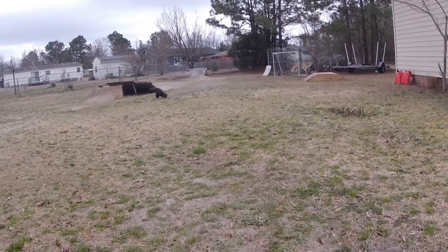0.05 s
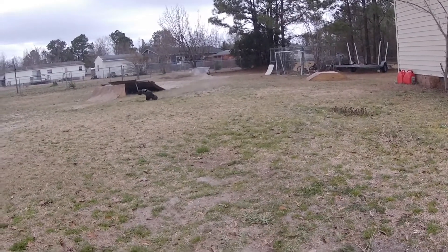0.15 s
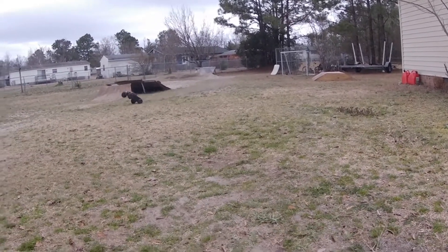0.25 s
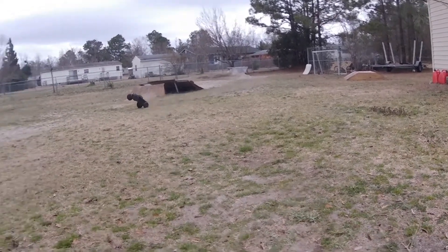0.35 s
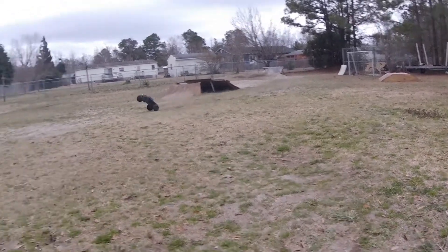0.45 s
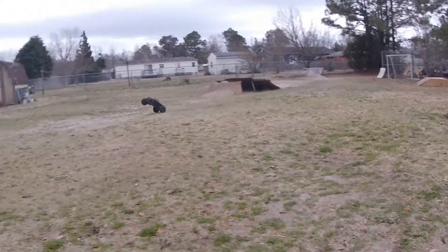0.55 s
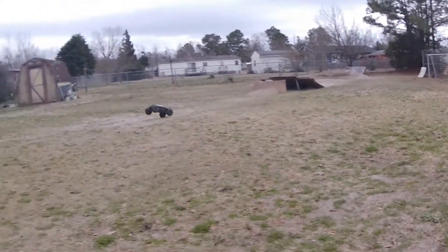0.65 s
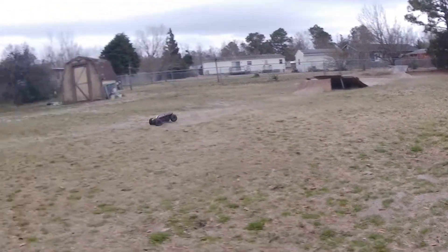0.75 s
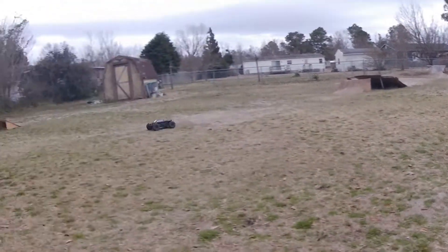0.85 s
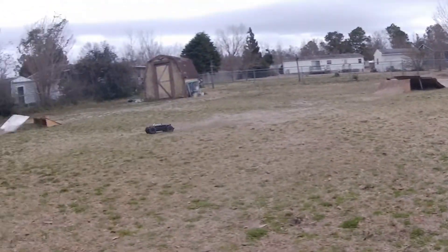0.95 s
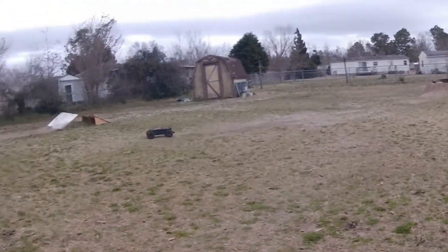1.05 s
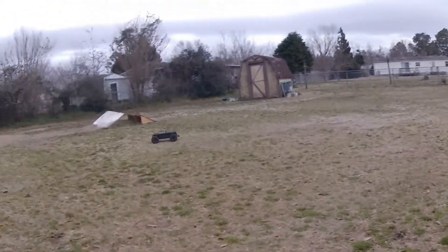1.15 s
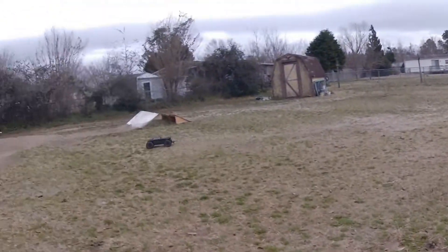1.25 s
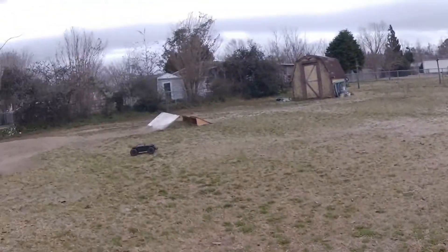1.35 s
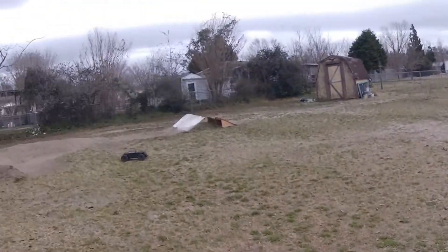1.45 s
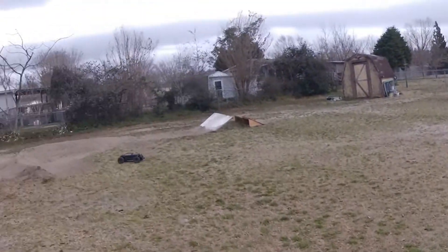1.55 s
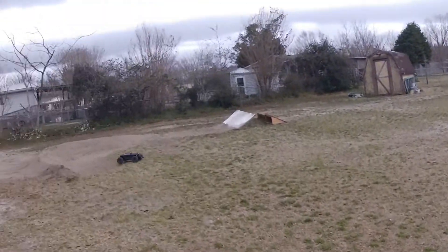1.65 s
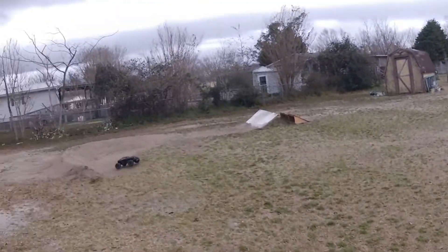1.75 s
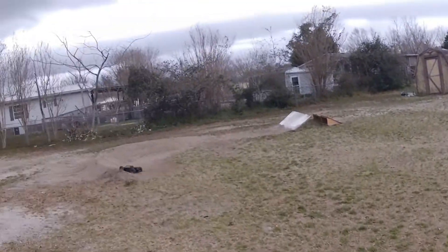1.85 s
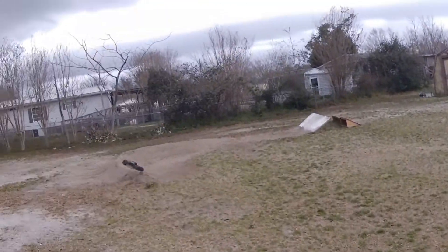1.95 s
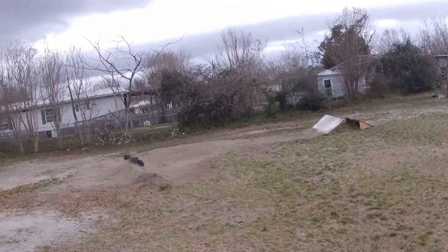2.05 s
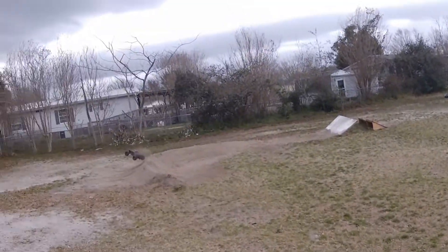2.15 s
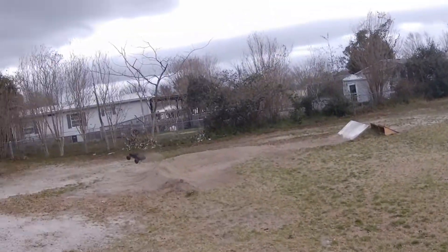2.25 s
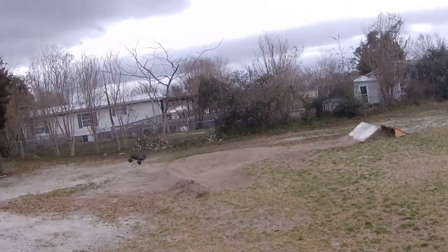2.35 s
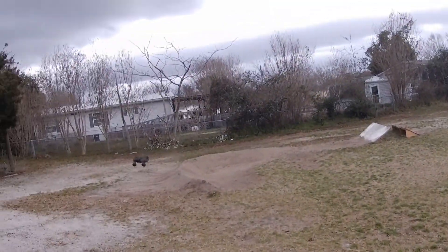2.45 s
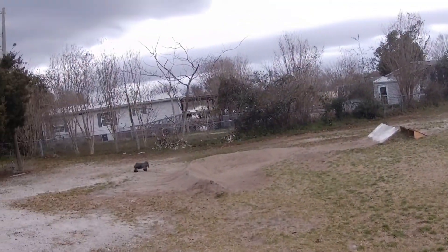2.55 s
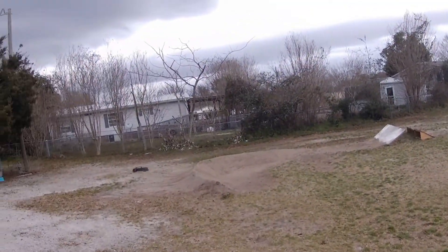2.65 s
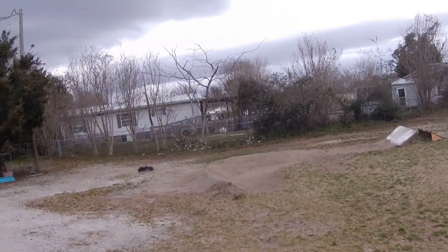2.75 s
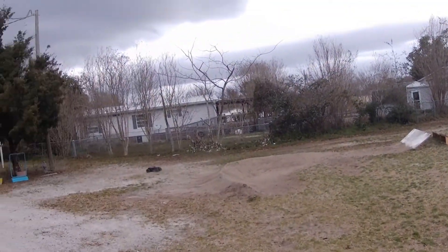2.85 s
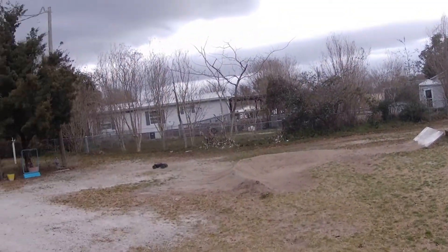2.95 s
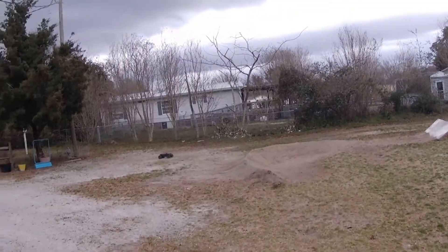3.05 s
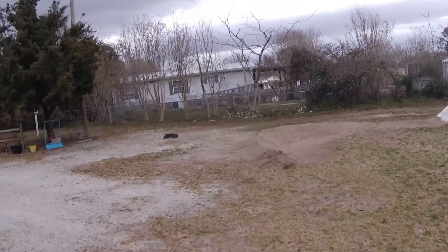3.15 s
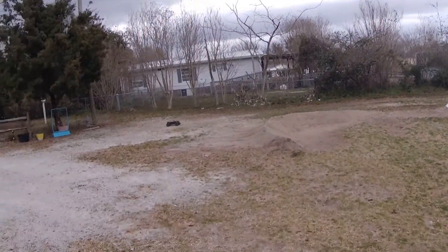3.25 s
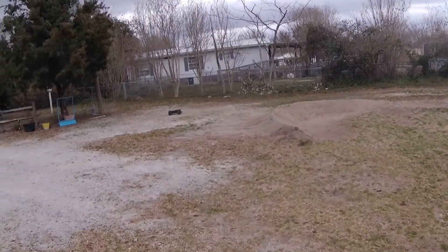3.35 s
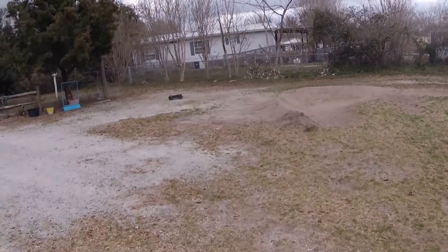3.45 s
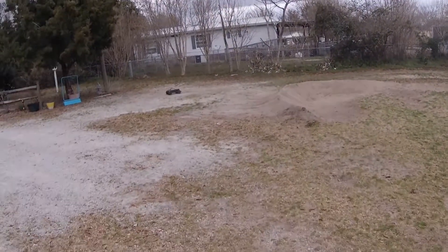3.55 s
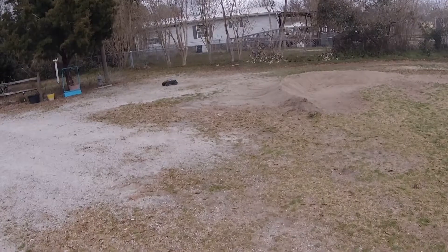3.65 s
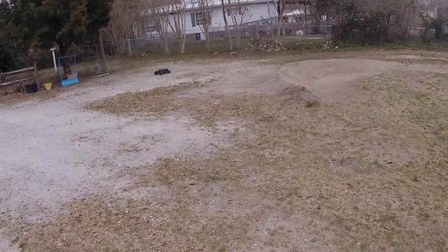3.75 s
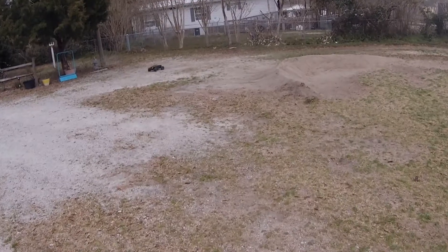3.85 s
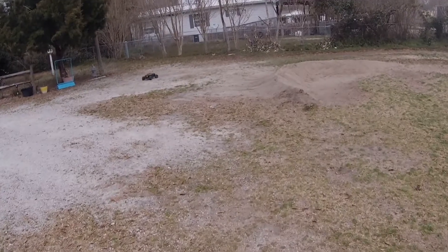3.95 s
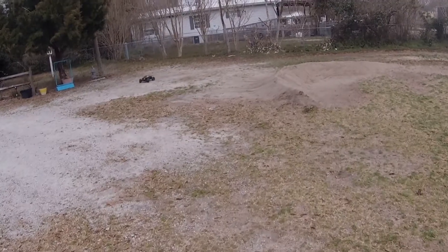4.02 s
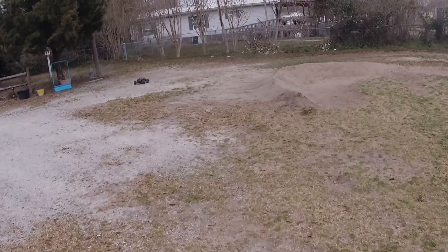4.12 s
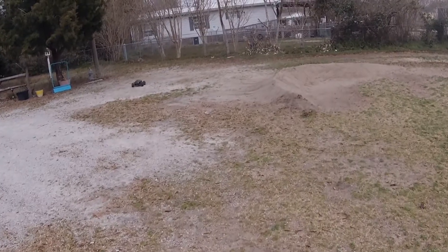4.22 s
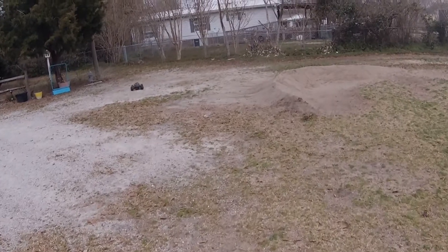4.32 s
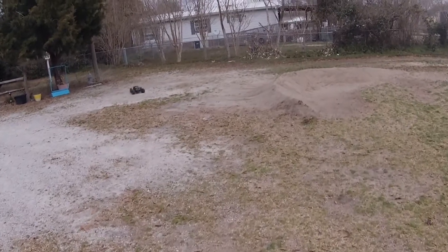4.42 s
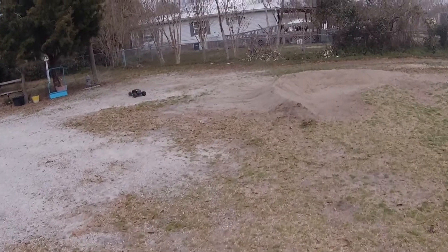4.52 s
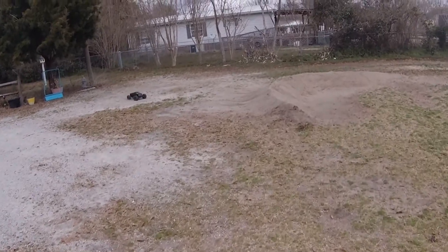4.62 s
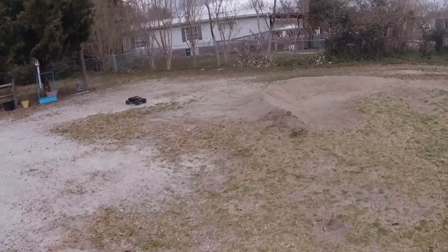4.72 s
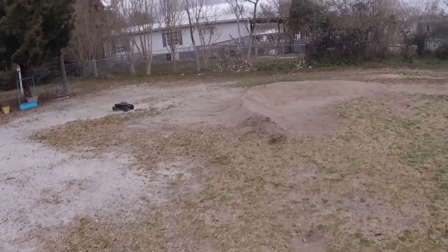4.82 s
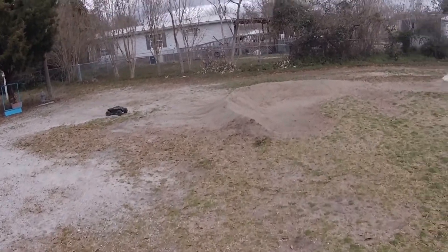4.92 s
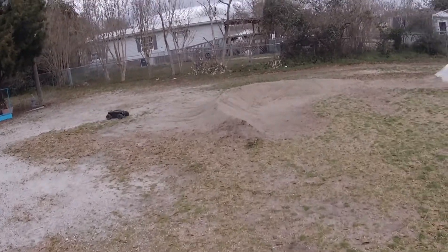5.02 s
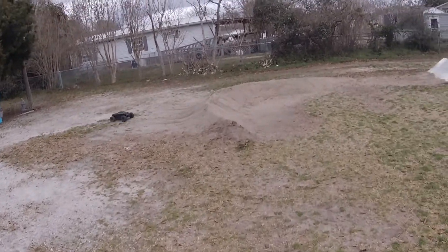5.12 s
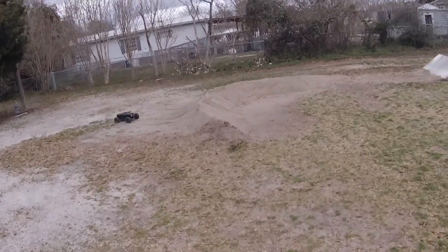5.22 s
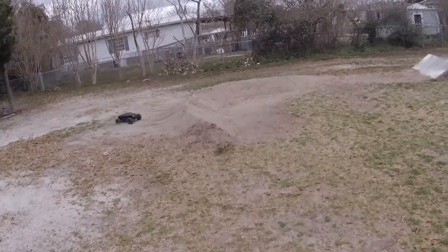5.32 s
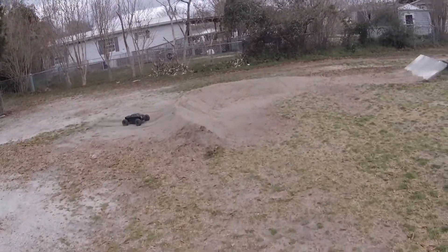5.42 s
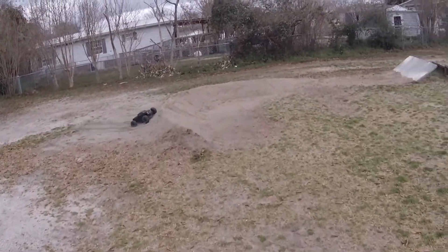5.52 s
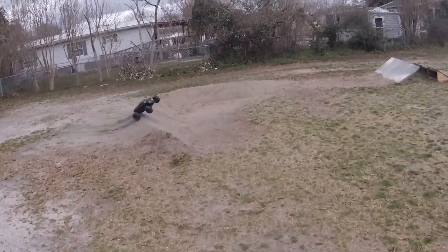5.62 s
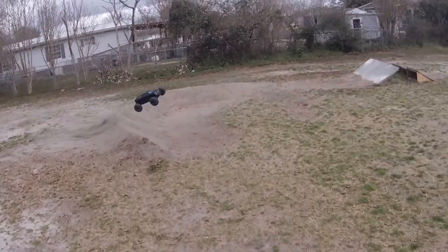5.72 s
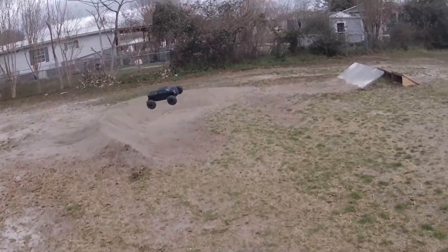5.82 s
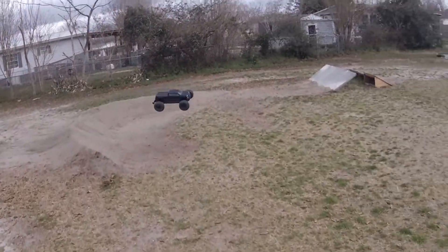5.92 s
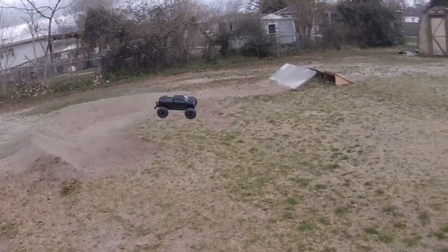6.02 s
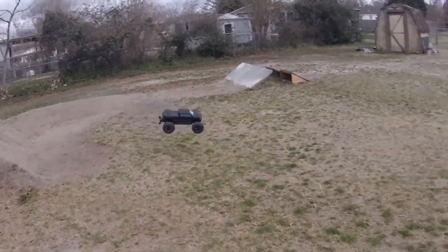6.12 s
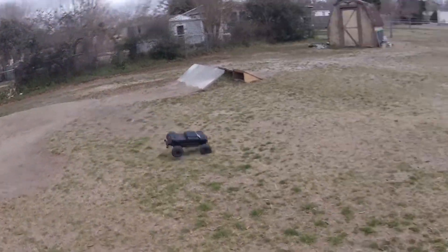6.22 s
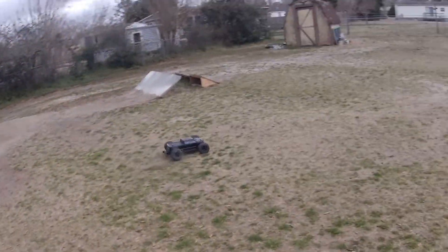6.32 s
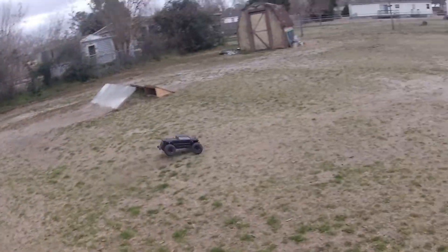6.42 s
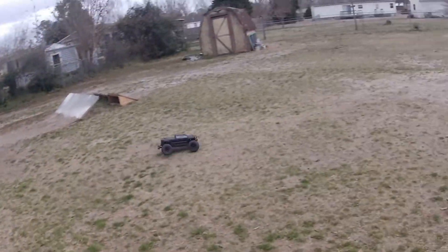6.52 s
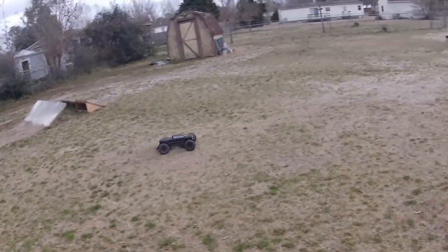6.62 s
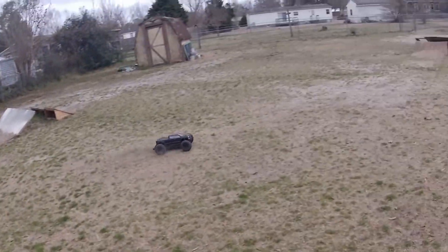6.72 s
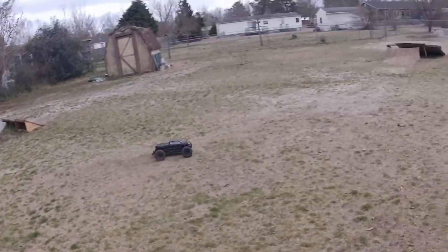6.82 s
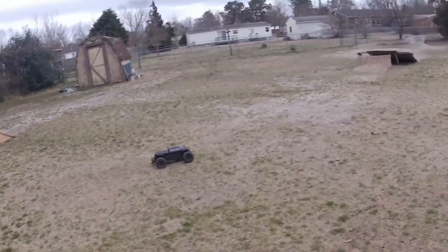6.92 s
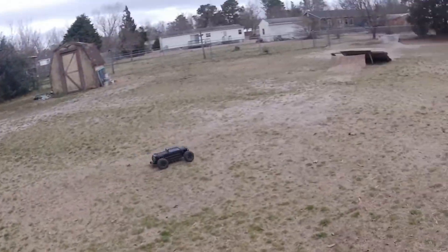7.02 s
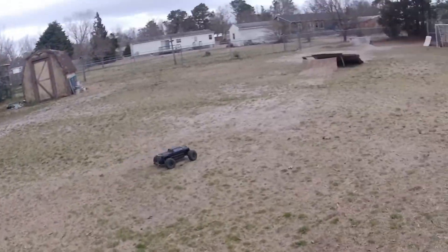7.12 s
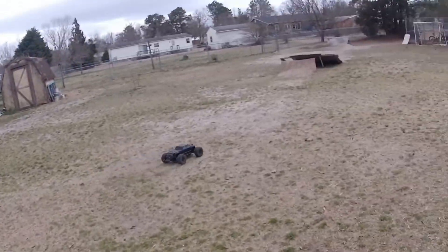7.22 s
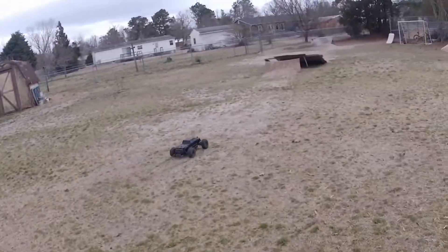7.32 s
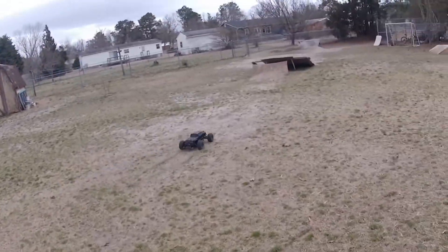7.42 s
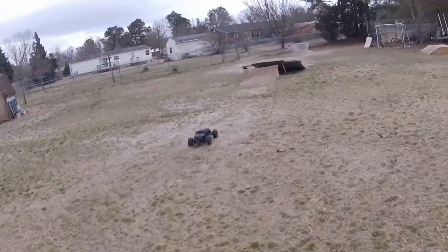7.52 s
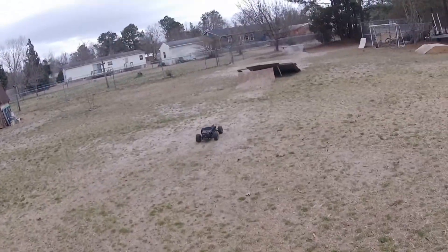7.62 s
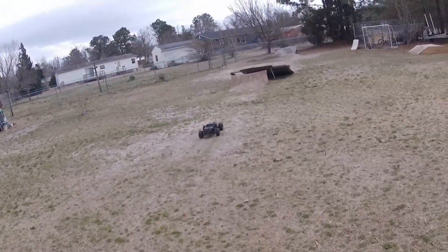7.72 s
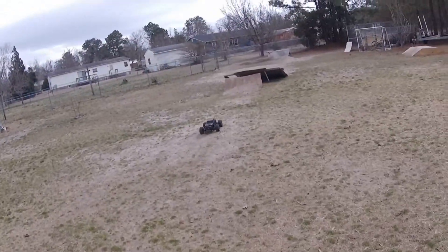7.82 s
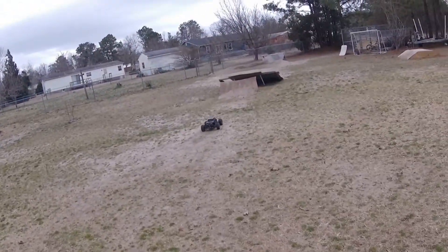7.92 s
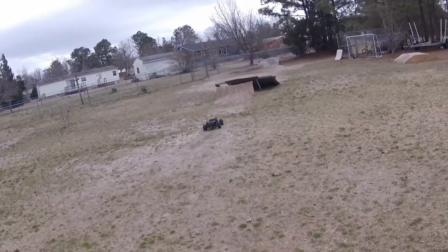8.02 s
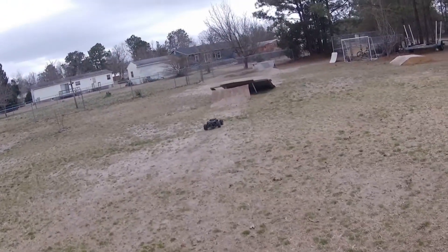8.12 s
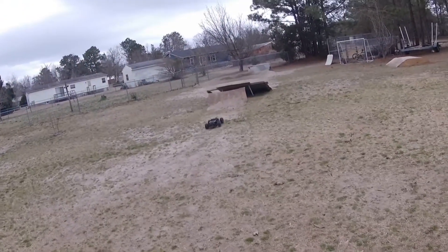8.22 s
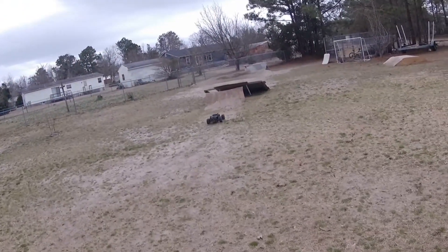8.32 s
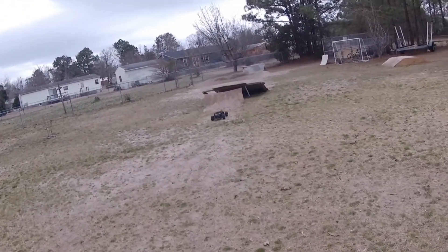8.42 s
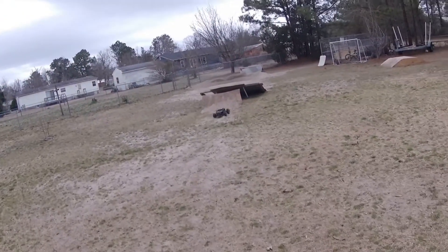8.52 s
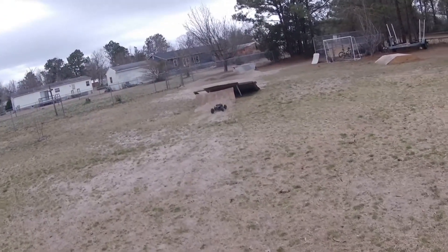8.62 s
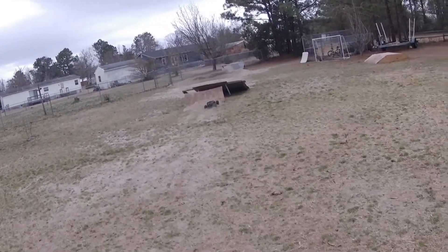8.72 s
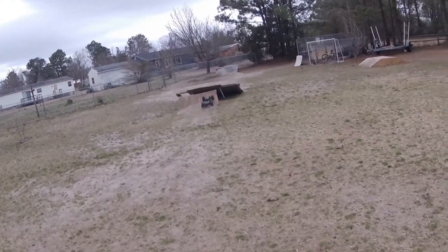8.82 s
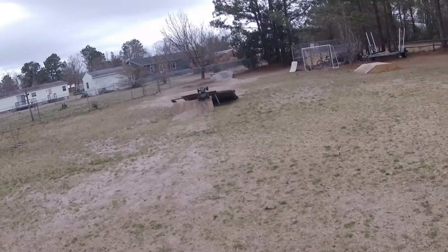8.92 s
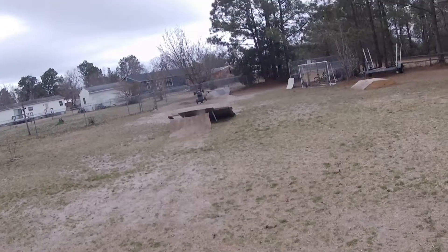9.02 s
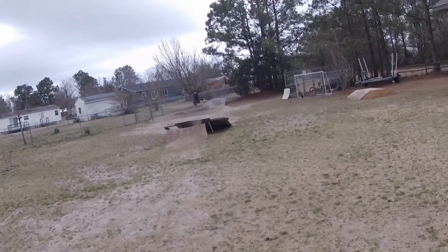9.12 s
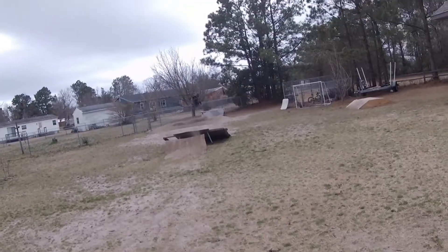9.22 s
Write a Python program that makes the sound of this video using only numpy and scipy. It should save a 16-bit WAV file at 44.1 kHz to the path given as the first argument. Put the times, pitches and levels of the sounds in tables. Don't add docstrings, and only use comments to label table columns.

```python
import sys
import numpy as np
from scipy import signal
from scipy.fft import rfft, irfft, next_fast_len
from scipy.io import wavfile
from scipy.ndimage import uniform_filter1d

SR = 44100
rng = np.random.default_rng(int(sys.argv[2]) if len(sys.argv) > 2 else 0)


def transcribe(signal):
    frames = np.atleast_2d(signal).T
    limited = np.clip(frames, -1, 1)
    pcm = np.round(limited * 32767).astype(np.int16)
    wavfile.write(sys.argv[1], SR, pcm)


def attenuation_scalar(level_db):
    decades = np.asarray(level_db, float) / 20
    return 10 ** decades


N = 408366


def shape(table, hz):
    f, db = np.transpose(table)
    return np.interp(np.log(np.maximum(hz, 1)), np.log(f), db, left=-80, right=-60)


def colour(x, table, lo, hi):
    n = next_fast_len(N)
    hz = np.arange(n // 2 + 1) * SR / n
    s = rfft(x, n) * attenuation_scalar(shape(table, hz))
    band = s[(hz > lo) & (hz < hi)]
    return irfft(s, n)[:N] * np.sqrt(n * N) / np.sqrt(2 * np.sum(np.abs(band) ** 2))


def walk(rate):
    k = int(SR / rate)
    held = np.repeat(rng.standard_normal(N // k + 1), k)
    return 1.3 * uniform_filter1d(uniform_filter1d(held, k), k)[:N]


def flutter(lo, hi):
    band = signal.butter(1, [lo, hi], "band", fs=SR, output="sos")
    x = signal.sosfilt(band, rng.standard_normal(N))
    return x / np.std(x)


def grit(per_s, share_db, flicker_db):
    size = rng.standard_normal(N) * attenuation_scalar(1.3 * rng.exponential(size=N))
    clicks = (rng.random(N) < per_s / SR) * size
    noise = rng.standard_normal(N) + attenuation_scalar(share_db) * clicks / np.std(clicks)
    return noise * attenuation_scalar(flicker_db * walk(70))


def curve(table, fade_s):
    s, *columns = np.transpose(table)
    t = np.arange(N) / SR
    on = (t >= s[0]) & (t <= s[-1])
    fade = np.clip(np.minimum(t[on] - s[0], s[-1] - t[on]) / fade_s, 0, 1)
    return on, [np.interp(t[on], s, c) for c in columns], fade


def swells(rows):
    t = np.arange(0, N + 64, 64) / SR
    power = np.zeros(len(t))
    for s, db, rise_s, fall_s in rows:
        away = np.where(t < s, (s - t) / rise_s, (t - s) / fall_s)
        power += attenuation_scalar(db - 20 * away) ** 2
    return np.interp(np.arange(N) / SR, t, np.sqrt(power))


# frequency in Hz, level in dB per Hz.
HISS = [(59, -4), (100, 1), (265, -33), (511, -38), (580, -11.5), (780, -29), (1070, -19), (1600, -27),
        (3160, -36), (4430, -39), (12300, -38), (13600, -31), (15800, -25)]
# frequency in Hz, level in dB.
CIRCUIT = [(14147, -73.5), (15735, -70), (15722, -79)]


def camera():
    out = attenuation_scalar(-73) * colour(rng.standard_normal(N), HISS, 2900, 13260)
    t = np.arange(N) / SR
    for hz, db in CIRCUIT:
        out += np.sqrt(2) * attenuation_scalar(db + .8 * walk(20)) * np.sin(2 * np.pi * hz * t)
    return out


# peak time in seconds, peak in dB, rise and fall in seconds over 20 dB.
GUSTS = [(.31, -47, 2.5, 1.5), (1.26, -40.5, .16, 0.75), (1.5, -41, .5, 0.1), (2.27, -48, 2, 1.2),
         (3.12, -38, .15, 0.16), (3.33, -40.5, .2, 0.34), (3.69, -39.5, .16, 0.2), (3.8, -48.5, .2, .9),
         (4.54, -46, 0.44, 1.4), (5.0, -40, .12, .25), (6.3, -39, .1, .12), (6.3, -51, 2.5, 1.5),
         (8.79, -46, .13, 1)]
# frequency in Hz, level in dB per Hz.
GUST = [(12, -36), (20, 7.5), (38, -2.5), (65, 3), (140, -16.5), (216, -14.5), (300, -47), (390, -49),
        (660, -120)]


def wind():
    breeze_db = -56.5
    lumps = rng.standard_normal(N) * attenuation_scalar(2.0 * walk(11))
    return np.hypot(swells(GUSTS), attenuation_scalar(breeze_db)) * colour(lumps, GUST, 19.0, 130)


def yard(x):
    lag = SR * .0006 * (1 + .35 * walk(14))
    bounce = np.interp(np.arange(N) - lag, np.arange(N), x)
    t = np.arange(SR // 4) / SR
    tail = rng.standard_normal(len(t)) * 1000 ** (-t / 0.27) * (t > .008)
    scatter = signal.fftconvolve(x, tail / np.linalg.norm(tail))[:N]
    return x + .4 * bounce + attenuation_scalar(-11) * scatter


# frequency in Hz, width in Hz, lift in dB.
HOUSING = [(2750, 120, 4), (4700, 250, 4), (5300, 200, -8), (5950, 250, 7), (6900, 200, 5), (7400, 200, 6),
           (8250, 400, -8), (8800, 250, 5), (9300, 200, 4), (9700, 200, -7), (10700, 500, 5),
           (12400, 400, -6)]


def housing(x):
    n = next_fast_len(N)
    hz = np.arange(n // 2 + 1) * SR / n
    lift_db = sum(db / (1 + (2 * (hz - f) / width) ** 2) for f, width, db in HOUSING)
    return irfft(rfft(x, n) * attenuation_scalar(lift_db), n)[:N]


def strike(events, modes):
    out, t = np.zeros(N + SR), np.arange(SR // 4) / SR
    hz, db, t60 = np.array(modes).T[:, :, None]
    chance = rng.standard_normal((len(events), 2, len(modes), 1))
    for (s, peak_db, bright_db), (pitch, size) in zip(events, chance):
        gain = attenuation_scalar(db + size + bright_db * (hz > 2000)) * (1 - np.exp(-t * hz / 1.8))
        tones = np.sin(2 * np.pi * hz * (1 + .002 * pitch) * t)
        ring = np.sum(gain * tones * 1000 ** (-t / t60), axis=0)
        start = int(s * SR)
        out[start:start + len(t)] += attenuation_scalar(peak_db) * ring / np.max(np.abs(ring))
    return out[:N]


# time in seconds, peak in dB, brightness in
# dB.
TICKS = [(2.578, -45, -20), (2.641, -33, -40), (3.004, -44, -30), (3.034, -38, -33), (3.057, -41, -21),
         (3.159, -45, -26), (5.999, -60, -20), (6.835, -22, -45), (7.206, -47, -20), (8.055, -33, -45),
         (8.531, -32, -18)]
MORE_TICKS = [(2.58, -38, -40), (2.612, -38, -40), (5.533, -33, -30), (5.999, -27, 6), (6.105, -27, -40),
              (6.125, -34, -40), (6.3, -24, -20), (6.345, -30, -40), (5.84, -40, -4), (5.92, -38, 2),
              (.548, -32, -15), (.672, -36, 0), (8.533, -34, -30)]
# frequency in Hz, level in dB, t60 in seconds.
PEBBLE = [(520, 0, 0.011), (1000, 1.5, 0.0094), (3100, 6.5, 0.0062)]


def pebbles():
    return strike(TICKS, PEBBLE) + strike(MORE_TICKS, PEBBLE)


# time in seconds, peak in dB, brightness in dB.
LANDINGS = [
    (6.285, -30, 0),
    (6.315, -30, 0),
    (8.79, -35, 0),
]
# frequency in Hz, level in dB, t60 in seconds.
TURF = [(98, 0, 0.15), (392, -5, 0.11)]


def landings():
    return strike(LANDINGS, TURF)


# time in seconds, peak in dB, brightness in dB.
KNOCKS = [
    (.1345, -9, -13.5),
    (8.7679, -4, -9),
]
TOUCHES = [
    (.1338, -24, 0),
    (8.7668, -13, 8),
    (4.755, -36, 14),
    (2.657, -42, -4),
]
# frequency in Hz, level in dB, t60 in seconds.
RAMP = [(552, -2, 0.017), (1046, 3.5, 0.02), (1157, -7.5, 0.042), (2600, 4.5, 0.012), (3150, 6, 0.014),
        (5280, -3, 0.012), (5960, -0.5, 0.0092), (7700, -12, 0.0071), (11000, -17.5, 0.0056)]


def ramp_knocks():
    return strike(KNOCKS, RAMP) + strike(TOUCHES, RAMP)


# time in seconds, peak in dB, brightness in dB.
TRIGGER = [
    (0.441, -11, -12),
    (1.437, -40, 5),
    (2.161, -27.5, -7),
    (3.302, -40.5, -14.5),
    (4.755, -44, -2),
    (5.651, -16.5, -9),
    (6.075, -18.5, -6.5),
    (6.758, -27, -6),
    (7.099, -29, -6.5),
    (7.366, -22.5, -6.5),
]
# frequency in Hz, level in dB, t60 in seconds.
GRIP = [(457, 10.5, 0.023), (1030, -0.5, 0.048), (1130, -12, 0.16), (2590, 9, 0.021), (5420, -8.5, 0.045),
        (5930, 1.5, 0.014)]
SPRING = [(2288, -6, .13), (4282, -15, .14), (7418, -19, .15)]


def trigger():
    return strike(TRIGGER, GRIP + SPRING)


# time in seconds, tyres in dB, looseness of the shafts in dB over the tyres.
ROLLING = [(0, -54.5, 1.5), (.66, -45, -9.5), (.9, -48, -11.5), (2.0, -57.5, -1), (2.2, -61.5, 6.5),
           (2.66, -62.5, -1), (3.2, -60.5, -20), (4.05, -68, 1.5), (4.62, -59, -7.5), (5.1, -61, -8.5),
           (5.52, -47.5, -11), (5.72, -55, 3.5), (6.25, -53, 4), (6.5, -52.5, -5.5), (7.5, -54, -4),
           (8.56, -64.5, 0), (8.92, -45.5, 0), (9.26, -57, 2)]


def rolling():
    _, (roll_db, loose_db), _ = curve(ROLLING, 1)
    return roll_db, roll_db + loose_db


# opening and closing in seconds, gear rasp in dB at opening and at closing.
THROTTLE = [(0, 0.779, -52, -58), (1.857, 2.204, -70, -65.5), (3.5, 5.198, -78, -62.5),
            (5.193, 5.685, -60.5, -53), (5.972, 6.11, -58, -51), (6.24, 6.342, -62, -48),
            (6.56, 6.803, -62.5, -61), (6.95, 7.131, -59.5, -57.5), (7.242, 7.404, -58, -60),
            (7.603, 7.882, -61, -64), (8.037, 8.31, -70.5, -63), (8.4, 8.663, -64, -57.5),
            (8.655, 8.76, -62, -68), (8.787, 9.266, -67, -63)]


def throttle():
    load, pulling = np.zeros(N), np.zeros(N)
    for opens, closes, first_db, last_db in THROTTLE:
        on, (db,), fade = curve([(opens, first_db), (closes, last_db)], 0.0071)
        load[on] += attenuation_scalar(db - 0.5) * fade
        pulling[on] = 1
    return load, uniform_filter1d(pulling, SR // 20)


# frequency in Hz, level in dB per Hz.
TYRES = [(180, -23), (300, -32), (349, -19), (516, 6.5), (589, 9), (726, 1), (1050, 4), (1510, -20.5),
         (1970, -41), (2200, -44), (2860, -63), (4840, -120)]


def tyres(roll_db, pulling):
    return attenuation_scalar(roll_db + 4 * pulling) * colour(grit(per_s=300, share_db=-8, flicker_db=1.2), TYRES, 400, 800)


# peak time in seconds, peak in dB, rise and fall in seconds over 20 dB.
THUDS = [(.44, -45.5, .2, 0.3), (.6, -54, 5, 3.5), (1.85, -59, 0.18, 0.1), (3.03, -59, 0.092, .3),
         (2.655, -41.5, 0.084, 0.09), (2.6, -50, .04, .2), (6.35, -42, .05, .1), (3.63, -60, .12, 0.7),
         (4.38, -59, 0.76, 5), (5.54, -47.5, 0.12, 0.03), (5.65, -43, .05, 0), (6.09, -44.5, 0.053, 0),
         (6.312, -28.5, 0.062, .062), (6.62, -50, .4, 0.3), (7.3, -54, 1.4, .5), (7.37, -49, 0.1, 0.1),
         (8.54, -50.5, 0.054, 0.5), (7.8, -59, 3.5, 5), (8.79, -39.5, 0.068, 0.2), (8.93, -45, .15, .1)]
# frequency in Hz, level in dB per Hz.
THUD = [(60, -38), (120, 4.5), (250, -3.5), (450, -1), (900, -1), (1500, -18.5)]


def chassis(roll_db):
    level = np.hypot(swells(THUDS), attenuation_scalar(roll_db - 10))
    return level * colour(grit(per_s=160, share_db=-3.5, flicker_db=2.5), THUD, 115, 490)


# frequency in Hz, level in dB per Hz.
RATTLE = [(1060, -16), (1800, -17.5), (2140, -21), (3240, 3), (4260, -23), (6070, -17), (7110, -19.5),
          (8110, -28), (9030, -27.5), (9730, -26), (10700, -26), (13000, -28)]


def shafts(rattle_db, pulling):
    rattle = colour(grit(per_s=900, share_db=-6.5, flicker_db=1.76), RATTLE, 3000, 4900)
    return attenuation_scalar(rattle_db + 2.5 * pulling) * rattle


# frequency in Hz, level in dB per Hz.
RASP = [(470, -2.5), (800, -1), (1070, 0.5), (1510, -16.5), (1990, -24), (2170, -22.5), (3320, -9),
        (4210, -21), (5140, -16.5), (5970, -15.5), (7200, -20.5), (8150, -23.5), (10600, -23),
        (15800, -21.5)]


def gears(load):
    return load * colour(grit(per_s=1500, share_db=-3, flicker_db=2.5), RASP, 4260, 7900)


def truck():
    roll_db, rattle_db = rolling()
    load, pulling = throttle()
    return tyres(roll_db, pulling) + chassis(roll_db) + shafts(rattle_db, pulling) + gears(load)


# peak time in seconds, peak in dB, rise and fall in seconds over 20 dB.
REVS = [
    (.03, -52, .3, .3),
    (.25, -46.5, .35, .5),
    (.7, -62, .4, .2),
    (5.58, -61, .5, .12),
    (6.06, -59, .2, .1),
    (6.315, -57, .12, .05),
]
# frequency in Hz, level in dB per Hz.
AIR = [(9000, -30), (10700, -10), (12400, -16), (13500, 0), (14500, 0), (15800, -3)]


def rotor_air():
    return swells(REVS) * colour(grit(per_s=900, share_db=-6, flicker_db=2.5), AIR, 12000, 16000)


# time in seconds, tooth rate in Hz, effort in dB at the source.
FAR_PULLS = [
    [(0, 8000, -33), (.04, 7600, -30.5), (.07, 7900, -40), (.09, 7800, -60), (.145, 7400, -55),
     (.16, 7300, -33), (.195, 7200, -32), (.215, 6650, -29), (.26, 6700, -29), (.3, 7150, -33),
     (.35, 7300, -35)],
    [(1.86, 2900, -57), (1.98, 2750, -41), (2.05, 3250, -37), (2.17, 3300, -47)],
    [(3.52, 1000, -54), (3.65, 1020, -44), (4.0, 1050, -43), (4.3, 1100, -47), (4.5, 1200, -40),
     (4.75, 1250, -43.5), (4.95, 1325, -49.5), (5.09, 1480, -46), (5.16, 1550, -40), (5.2, 1700, -43)],
    [(5.195, 1690, -50), (5.235, 2000, -52), (5.26, 2150, -42), (5.285, 2400, -52), (5.335, 2760, -56),
     (5.355, 3000, -30), (5.42, 3150, -30), (5.46, 3600, -38), (5.5, 3350, -36), (5.57, 3350, -32),
     (5.6, 3700, -36), (5.65, 3850, -35)],
    [(5.97, 3200, -38.5), (6.0, 3300, -27), (6.05, 4500, -31.5), (6.1, 4850, -43)],
]
# time in seconds, tooth rate in Hz, effort in dB at the source.
NEAR_PULLS = [
    [(6.56, 1600, -62), (6.61, 1650, -54), (6.65, 1690, -47), (6.685, 1720, -45), (6.715, 1880, -46.5),
     (6.75, 1700, -45), (6.8, 1650, -57)],
    [(6.945, 1750, -56), (6.965, 2200, -50), (6.975, 1700, -40), (7.0, 1800, -41), (7.04, 1950, -39),
     (7.07, 2400, -36), (7.1, 2000, -44), (7.118, 2330, -44), (7.132, 1700, -48)],
    [(7.25, 1550, -54), (7.27, 1650, -34), (7.285, 2320, -41), (7.305, 2480, -37), (7.35, 2560, -37),
     (7.365, 2500, -42), (7.385, 1950, -42)],
    [(7.6, 1600, -52), (7.63, 1560, -44), (7.67, 1750, -45), (7.7, 1700, -46), (7.73, 1930, -47),
     (7.77, 2070, -46), (7.81, 1920, -44), (7.855, 2100, -48), (7.89, 2100, -58)],
    [(8.03, 1900, -50.5), (8.12, 1900, -48), (8.2, 1960, -46), (8.31, 1900, -49)],
    [(8.42, 2000, -50), (8.5, 2150, -50), (8.52, 2750, -35.5), (8.56, 3200, -30), (8.65, 3750, -43)],
    [(8.702, 6500, -40), (8.717, 5300, -40), (8.722, 5800, -60), (8.73, 5600, -42), (8.742, 4200, -42)],
    [(8.79, 2750, -40.5), (8.865, 3450, -32), (8.885, 4050, -33.5), (8.925, 5000, -33.5), (8.98, 5600, -39),
     (9.02, 7000, -41), (9.12, 8600, -52), (9.26, 9300, -49)],
]
# time in seconds, lug rate in Hz, level in dB at the source.
LUGS = [
    [(6.0, 875, -54), (6.06, 1030, -44), (6.12, 1195, -41)],
    [(7.255, 1080, -40), (7.32, 1074, -40), (7.36, 1100, -50)],
    [(7.62, 1050, -53), (7.75, 1064, -49), (7.88, 1052, -55)],
    [(8.85, 485, -41), (8.92, 642, -34), (8.97, 665, -37), (8.995, 520, -42)],
    [(9.0, 1098, -52), (9.08, 1080, -46.5), (9.2, 1053, -54)],
]
# second and third partial in dB over the first, roughness in % of pitch.
VOICES = [(0, -40, 1.7), (-14, -11, 1.62), (-3, -8.5, 0.5), (-8, -9, 1.85), (-8, -14, 2.2), (5.5, -4, 3),
          (1.5, -6, 2), (-3, -7, 1.2), (-5, -4, 2.54), (-6, -7, 1.8), (-10, -15, 1.3), (-30, -40, 1.5),
          (-13, -34, 1.2), (-30, -30, 3.8), (-30, -29, 1.4), (-30, -30, 5.5), (-5, -12, 2.3),
          (-30, -30, 5.9)]
# multiple of the tooth rate, level in dB under the third.
PARTIALS = [(4, -14), (5, -18), (6, -20), (7, -13), (8, -14), (9, -16)]
# multiple of the tooth rate, level in dB under the third.
SECOND_GEAR = [(1.46, -17), (2.53, -5), (3.4, -8)]


def motor():
    out, hold = np.zeros(N), int(.016 * SR)
    slow_hz, slow_dull_db = 1410, 10
    wobble = 0.064 * uniform_filter1d(flutter(9, 26), 300)
    jitter = .01 * walk(450)
    throb = attenuation_scalar(2.5 * walk(60) + 4.5 * walk(220) - 2)
    throbs = [np.roll(throb, k * SR // 3) for k in range(3 + len(PARTIALS + SECOND_GEAR))]
    for pull, (second_db, third_db, rough) in zip(FAR_PULLS + NEAR_PULLS + LUGS, VOICES):
        on, (hz, effort_db), fade = curve(pull, 0.0045)
        grip = np.minimum(np.arange(len(hz)) // hold * hold + hold // 2, len(hz) - 1)
        stepped = uniform_filter1d(hz[grip], hold // 3)
        hz = np.where((hz > 1600) & (second_db > -20), stepped, hz)
        hz = hz * (1 + rough * jitter[on] + wobble[on] * np.clip((1150 / hz) ** 7, .1, 1))
        phase = 2 * np.pi * np.cumsum(hz) / SR
        dull_db = slow_dull_db * np.log2(np.clip(hz, 1000, slow_hz) / slow_hz)
        upper = PARTIALS + SECOND_GEAR * int(rough > 1.5)
        levels = [(1, 0), (2, second_db), (3, third_db)] + [(k, third_db + db) for k, db in upper]
        depth = np.clip(rough / 1.65, .7, 1)
        for (k, db), throb in zip(levels, throbs):
            mesh_db = 0.77 * shape(RASP, np.minimum(k * hz, 15000))
            heard = attenuation_scalar(effort_db + db + (k > 1) * dull_db + mesh_db) * (k * hz < 15800)
            patchy = throb[on] ** (depth + .1 * (k > 1))
            out[on] += 1.31 * fade * heard * patchy * np.sin(k * phase)
    return out


def scene():
    port_lag_s, port_noise_db = 9e-6, -16.5
    distant = housing(yard(motor() + truck()))
    blows = trigger() + ramp_knocks() + landings() + pebbles()
    mid = distant + blows + rotor_air() + wind() + camera()
    slope = np.gradient(mid) * SR * port_lag_s / 2
    stray = np.diff(mid, n=2, prepend=[0, 0]) * walk(500)
    high = signal.butter(2, 700, "high", fs=SR)
    side = signal.filtfilt(*high, attenuation_scalar(port_noise_db) * stray - slope)
    return np.array([mid + side, mid - side])


def top_cut(x):
    return signal.sosfilt(signal.butter(12, 16920, fs=SR, output="sos"), x)


def record(dry):
    low_pass = signal.ellip(8, .2, 50, 15860, fs=SR, output="sos")
    return top_cut(signal.sosfilt(low_pass, dry))


dry = scene()
out = record(dry)
transcribe(out)
```